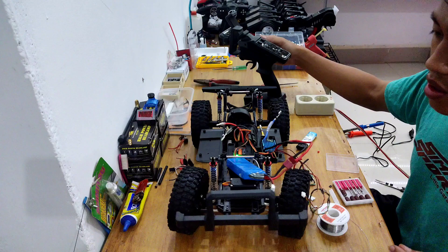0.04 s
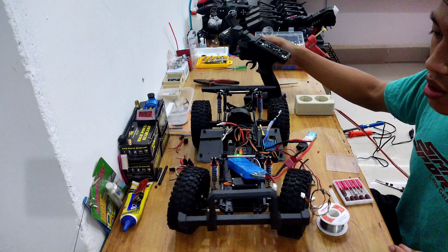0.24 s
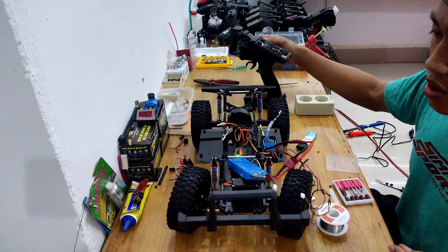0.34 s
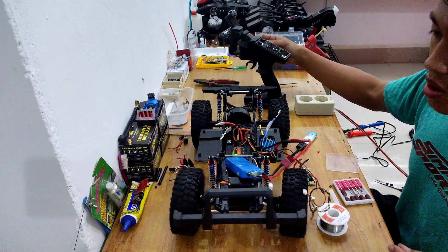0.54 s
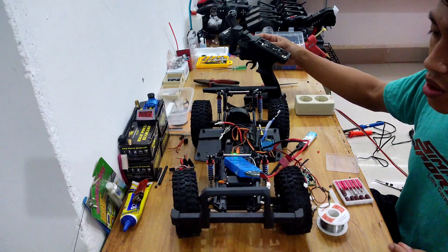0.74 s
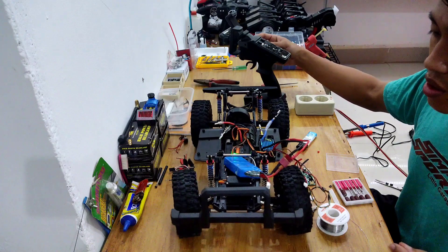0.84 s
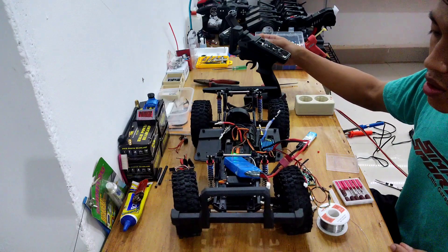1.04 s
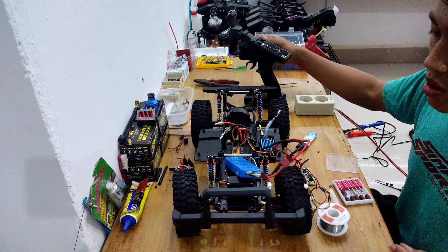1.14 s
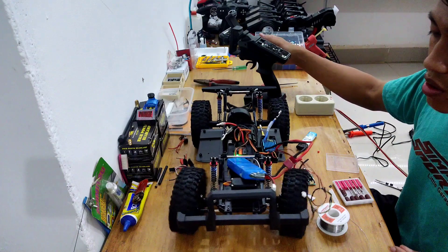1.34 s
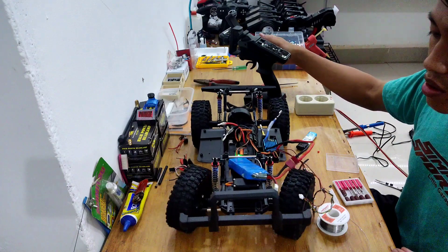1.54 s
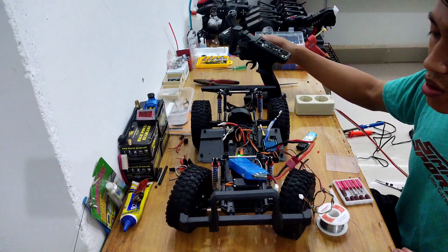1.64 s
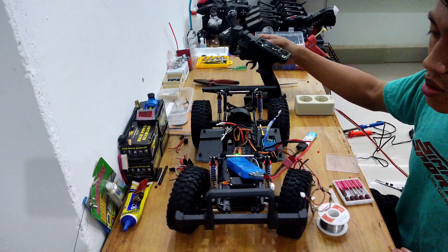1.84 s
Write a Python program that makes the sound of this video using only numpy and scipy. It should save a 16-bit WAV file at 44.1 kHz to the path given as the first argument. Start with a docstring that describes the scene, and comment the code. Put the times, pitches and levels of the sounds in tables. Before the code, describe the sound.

A model car's steering servo whines and rattles in short strokes, ending with a knock.

```python
"""Over a low rumble and a faint hum, a short rasp: a small servo twitches, then swings the wheels of a
model car to and fro on a wooden workbench, close to the microphone in a small room. Its eleven-tooth
pinion whines and rattles through the gear case, slowing as the tyres load it, and the steering shakes
the bench. Between strokes it twitches again; at full lock the linkage knocks, with a faint second tap.
The car sits in the centre of the stereo picture, and only the treble spreads."""
import sys
import numpy as np
from scipy import signal
from scipy.fft import rfft, irfft
from scipy.io import wavfile
from scipy.ndimage import uniform_filter1d

SR = 44100
rng = np.random.default_rng(int(sys.argv[2]) if len(sys.argv) > 2 else 0)


def master_out(mix):
    """Clip the mix to full scale and print it as 16-bit PCM to the path in sys.argv[1]."""
    frames = np.transpose(np.atleast_2d(mix))
    ceiling = np.clip(frames, -1, 1)
    pcm = np.round(ceiling * 32767).astype(np.int16)
    wavfile.write(sys.argv[1], SR, pcm)


N = 83790
T = np.arange(N) / SR
TOP_HZ = 14150  # upper limit of the whine and of the recorder

# spectrum of loose teeth rattling: (frequency [Hz], relative level [dB])
RATTLE_SPECTRUM = [(1000, -14.5), (1400, -12), (1800, -5.5), (2020, -11.5), (2450, -1.5), (2800, -3),
                   (3200, -10), (3700, -7), (4300, 2.5), (4900, -4), (5700, -8.5), (6600, -11),
                   (7400, -0.5), (8300, -7), (9500, -9), (10200, -15.5), (11200, -14.5), (12500, -23.5),
                   (14500, -27.5)]


def undb(db):
    """Decibels to gain."""
    return 10 ** (np.asarray(db) / 20)


def unit(x):
    """Scale to rms 1."""
    return x / np.sqrt(np.mean(x ** 2))


def colour(x, points, power=False):
    """Causal filter through (frequency [Hz], gain [dB]); with power, white noise keeps its level."""
    size = 2 * N
    hz, db = np.array(points, float).T
    bin_hz = np.arange(N + 1) * SR / size
    gain = undb(np.interp(np.log(bin_hz + 1), np.log(hz), db))
    cepstrum = irfft(np.log(unit(gain) if power else gain))
    cepstrum[1:N] *= 2  # fold to minimum phase
    cepstrum[N + 1:] = 0
    return irfft(rfft(x, size) * np.exp(rfft(cepstrum)))[:N]


def wander(per_s):
    """Smooth random wander of rms 1."""
    hold = max(int(SR / per_s), 2)
    steps = np.repeat(rng.standard_normal(N // hold + 1), hold)
    return unit(uniform_filter1d(steps, hold)[:N])


def room_tone():
    """The room's steady low rumble, thinning to a faint hiss."""
    # background spectrum: (frequency [Hz], relative level [dB])
    spectrum = [(20, -1), (40, -12), (80, -14), (150, -23), (700, -27), (1600, -31), (2560, -34),
                (5500, -43.5), (14000, -45)]
    return undb(-57) * colour(rng.standard_normal(N), spectrum, power=True)


def clatter(per_s, grain_db):
    """Dense tiny clicks of uneven size from the play between the teeth."""
    hits = rng.random(N) < per_s / SR
    return unit(hits * rng.standard_normal(N) * undb(grain_db * wander(1400)))


def twitches():
    """Hunting for its position, the motor nudges the gears in rasps too short to reach a pitch."""
    # nudges of the motor: (peak time [s], level [dB], rise [s], fall [s])
    nudges = [(0.033, -48.5, 0.04, 0.04), (0.429, -45, 0.021, 0.032), (0.468, -51, 0.0069, 0.005),
              (1.156, -54.5, 0.0085, 0.012), (1.174, -49, 0.011, 0.0068), (1.189, -53, 0.0067, 0.0062),
              (1.678, -53.5, 0.03, 0.013), (1.777, -50, 0.012, 0.02), (1.82, -47.5, 0.0081, 0.022),
              (1.848, -54, 0.01, 0.02), (1.897, -51.5, 0.027, .025)]
    # the duller tone of slow gears: (frequency [Hz], gain [dB])
    slow_tone = [(900, 1), (2500, 4.5), (4300, -1), (11000, -1.5)]
    envelope = np.zeros(N)
    for at, db, rise, fall in nudges:
        from_peak = np.maximum((at - T) / rise, (T - at) / fall)
        envelope += undb(db) * np.exp(1 - np.hypot(1, 2 * from_peak))  # rounded peak
    clicks = envelope * clatter(per_s=24000, grain_db=1.8)
    return colour(colour(clicks, RATTLE_SPECTRUM, power=True), slow_tone)


def hum(hz=128):
    """A faint low hum swells, wavers and fades."""
    # course of the hum: (time [s], level [dB])
    course = [(.05, -75.5), (.15, -65), (.7, -66.5), (1.15, -75)]
    level_db = np.interp(T, *np.array(course).T) + 2 * wander(12)
    return undb(level_db) * np.sin(2 * np.pi * hz * T)


def steering():
    """Four strokes that slow under load: returns tooth rate, whine gain and rattle gain."""
    # one list per stroke: (time [s], tooth rate [Hz], whine level [dB], rattle level [dB])
    strokes = [
        [(.08, 1487, -78, -50), (.12, 1723, -51, -44.5), (.145, 1559, -52, -38), (.158, 1330, -44, -42),
         (.169, 1107, -49.5, -44.5), (.188, 781, -77, -55)],
        [(.24, 1750, -73, -52), (.274, 1752, -46, -44), (.3, 1800, -40.5, -39.5), (.333, 1738, -33, -38.5),
         (.349, 1679, -31, -38), (.358, 1574, -35, -32), (.366, 1350, -38.5, -46), (.377, 1122, -42.5, -49),
         (.387, 1026, -55, -42), (.398, 800, -72, -62)],
        [(.485, 1907, -80, -52), (.53, 1877, -49, -40), (.56, 1709, -40, -35.5), (.58, 1560, -40.5, -39),
         (.6, 1375, -40.5, -37), (.62, 1324, -39.5, -39), (.632, 1393, -36, -38.5), (.642, 1424, -36, -35.5),
         (.665, 1442, -40.5, -34.5), (.68, 1374, -32.5, -37.5), (.693, 1307, -37.5, -42.5),
         (.725, 1274, -36.5, -37), (.739, 1257, -38, -43), (.747, 1214, -49, -43), (.76, 1171, -39, -38),
         (.797, 1045, -42.5, -45), (.808, 965, -68, -38), (.828, 842, -63.5, -38.5), (.86, 591, -89, -52.5)],
        [(1.21, 1930, -80, -59), (1.27, 1897, -50, -43), (1.297, 1873, -45.5, -44), (1.31, 1860, -39.5, -38.5),
         (1.35, 1759, -37.5, -38.5), (1.4, 1681, -33.5, -37.5), (1.45, 1631, -37.5, -40.5),
         (1.5, 1591, -34, -43), (1.528, 1566, -37.5, -41), (1.546, 1510, -28.5, -38), (1.569, 1433, -37, -35.5),
         (1.579, 1330, -36, -39), (1.589, 1130, -49, -39), (1.599, 869, -72, -36.5)],
    ]
    whine, rattle = np.zeros(N), np.zeros(N)
    for stroke in strokes:
        times, _, whine_db, rattle_db = np.array(stroke).T
        outside_s = np.abs(T - np.clip(T, times[0], times[-1]))
        fade = np.exp(-outside_s / .0097)
        whine += fade * undb(np.interp(T, times, whine_db))
        rattle += fade * undb(np.interp(T, times, rattle_db))
    times, tooth_hz, _, _ = np.vstack(strokes).T
    return np.interp(T, times, tooth_hz), whine, rattle


def gears(tooth_hz, whine, rattle):
    """Meshing teeth whine through the case; uneven teeth add lines a shaft rate apart, and clatter."""
    # response of the gear case to the tooth tone: (frequency [Hz], gain [dB])
    gear_case = [(1000, -19.5), (1300, -15), (1550, -26.5), (1780, -5), (2200, -2), (2570, 3.5), (2720, -2),
                 (2900, -12.5), (3100, -10.5), (3450, -10.5), (3850, -3.5), (4250, 10), (4600, -3),
                 (4750, -6.5), (4880, -10), (5080, -4.5), (5700, -12), (6220, -3), (6600, -17),
                 (6900, -6.5), (7100, 3.5), (7380, -11.5), (7650, -3), (8100, -5.5), (8950, -3.5),
                 (10100, -14), (10800, -9), (13500, -36)]
    teeth, loaded_hz = 11, 1260
    speed_jitter, tooth_jitter_rad, flutter_db = .005, .135, 1.6
    hz = tooth_hz * (1 + speed_jitter * wander(250))
    phase = 2 * np.pi * np.cumsum(hz) / SR + tooth_jitter_rad * wander(1100)
    # fast, lightly loaded gears and braking gears both mesh more softly, losing upper harmonics
    fast_db = -22 * np.maximum(tooth_hz - loaded_hz, 0) / 1000
    brake_db = -10 * np.maximum(loaded_hz - tooth_hz, 0) / 1000
    tone, shaft_lines = np.zeros(N), np.zeros(N)
    for k in range(1, 11):
        level_db = flutter_db * wander(130)
        contact_db = 3 * wander(44.764)  # the contact between the teeth shifts
        level_db += (k > 3) * (fast_db + contact_db) + (k > 4) * brake_db
        tone += (k * hz < TOP_HZ) * undb(level_db) * np.cos(k * phase + 2 * np.pi * rng.random())
    for k in range(teeth - 2, 120):
        if k % teeth:  # skip the tooth harmonics
            gain = (k * hz / teeth < SR / 2) * undb(6.1 * wander(18))
            shaft_lines += gain * np.cos(k * phase / teeth + 2 * np.pi * rng.random())
    loose = undb(-9.5) * unit(shaft_lines) + undb(-5.5) * clatter(per_s=14000, grain_db=3)
    return colour(whine * tone, gear_case) + colour(rattle * loose, RATTLE_SPECTRUM, power=True)


def bench(rattle):
    """The steering shakes the wooden bench, which rumbles in step with the rattle."""
    # spectrum of the shaken bench: (frequency [Hz], relative level [dB])
    spectrum = [(25, 5), (55, -9), (95, -10.5), (135, -8), (220, -15.5), (500, -32.5)]
    return undb(-13) * rattle * colour(rng.standard_normal(N), spectrum, power=True)


def knocks():
    """The linkage snaps against its stop and rings the plastic chassis."""
    # hits on the stop: (time [s], level [dB])
    hits = [(1.6077, -29.5), (1.6289, -48.5)]
    # chatter within a hit: (delay [s], push [ratio])
    chatter = [(.0007, 0.24), (.0018, 1), (.0052, 0.28)]
    # chassis modes: (frequency [Hz], relative level [dB], time to fall 60 dB [s])
    chassis_modes = [(393.1, -2.5, 0.032), (577.6, 2, 0.018), (901, -2.5, 0.024), (1160, 3.5, 0.014),
                     (1312, 5, 0.02), (1840, -5.5, 0.024), (2217, -3.5, 0.049), (2410, 2.5, 0.0096),
                     (3183, 1, 0.009), (4570, -2, 0.0091)]
    sound = np.zeros(N)
    for at, db in hits:
        for delay, push in chatter:
            age = np.maximum(T - at - delay, 0)
            for k, (hz, mode_db, t60) in enumerate(chassis_modes):
                ring = np.sin(2 * np.pi * hz * age) * np.exp(-np.log(1000) * age / t60)
                sound += (-1) ** k * push * undb(db + mode_db) * ring
    return sound


def echoes(x, t60_s):
    """Scattered reflections reach the microphone from 2 ms after the direct sound and die away."""
    response = rng.standard_normal(N) * np.exp(-np.log(1000) * T / t60_s) * (T > .002)
    return signal.fftconvolve(x, response / np.sqrt(np.sum(response ** 2)))[:N]


def room(x):
    """Direct sound, near surfaces and the room's tail; treble echoes and faint hiss give the width."""
    # colour of the room's tail: (frequency [Hz], gain [dB])
    tail_tone = [(1000, -3), (1800, -5), (2800, 2), (3700, 4), (4250, -7), (4800, -4), (6000, -10),
                 (7800, 5.5), (10000, -7), (14000, 4.5)]
    # stereo width: (frequency [Hz], side gain [dB])
    width = [(3800, -78), (5500, -44), (7500, -9), (10000, -7), (14000, -11)]
    early = undb(-16) * echoes(x, t60_s=.008)
    tail = undb(-11.5) * colour(echoes(x, t60_s=.62), tail_tone)
    side = colour(echoes(x, t60_s=.15) + undb(-65) * rng.standard_normal(N), width)
    return x + early + tail + side * np.array([[1], [-1]])


def scene():
    """At the microphone: servo and linkage in the room, over bench rumble, room tone and hum."""
    tooth_hz, whine, rattle = steering()
    car = gears(tooth_hz, whine, rattle) + twitches() + knocks()
    return room(car) + bench(rattle) + room_tone() + hum()


def record(dry):
    """The recorder cuts the top treble steeply."""
    return signal.sosfilt(signal.ellip(10, .2, 70, TOP_HZ, fs=SR, output="sos"), dry)


dry = scene()
out = record(dry)
master_out(out)
```